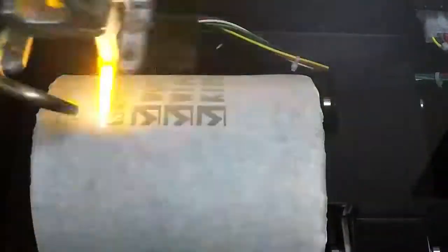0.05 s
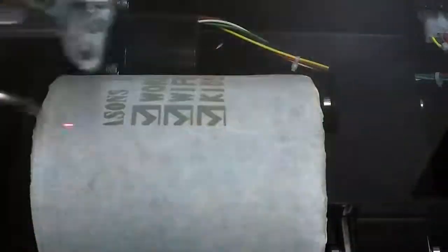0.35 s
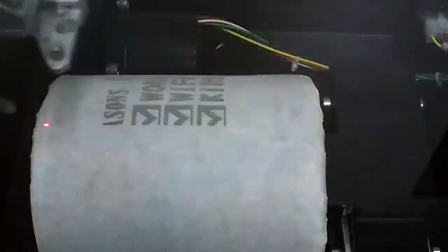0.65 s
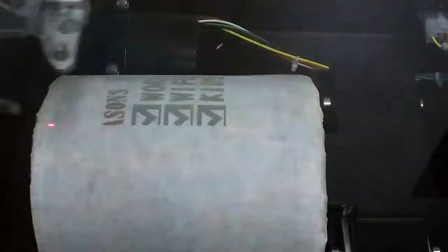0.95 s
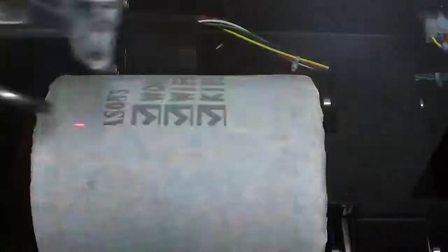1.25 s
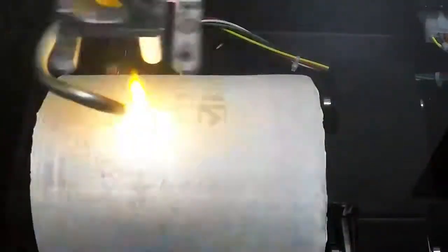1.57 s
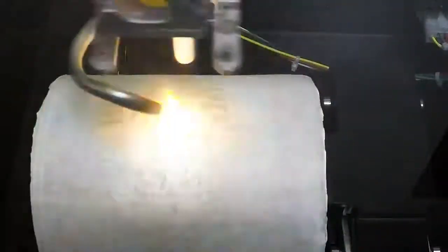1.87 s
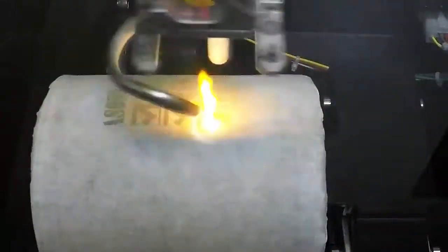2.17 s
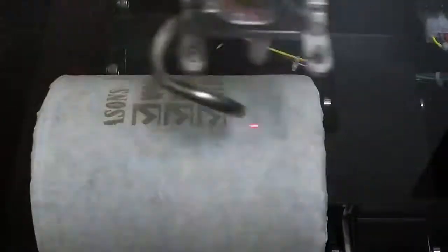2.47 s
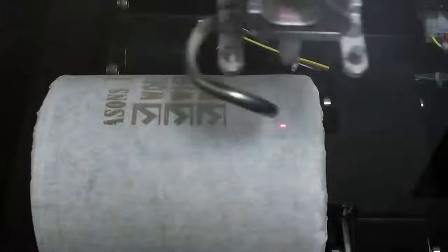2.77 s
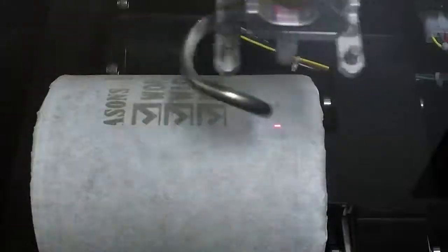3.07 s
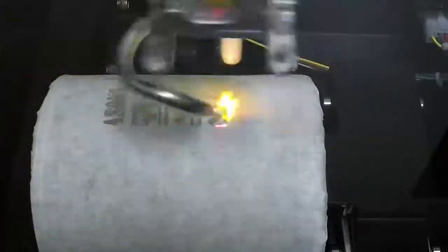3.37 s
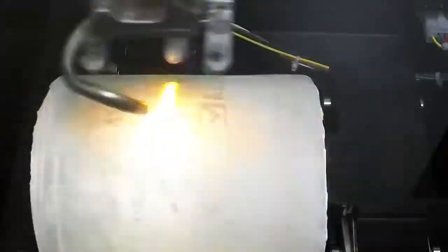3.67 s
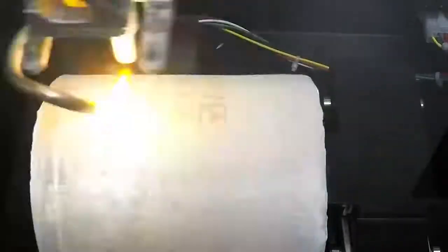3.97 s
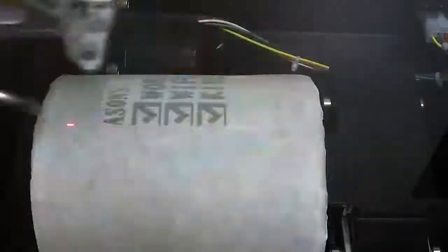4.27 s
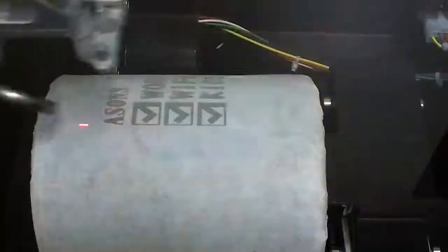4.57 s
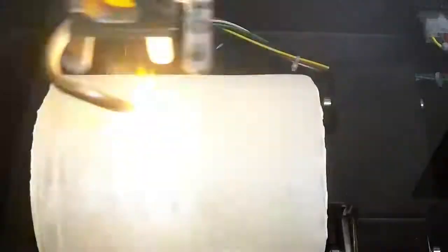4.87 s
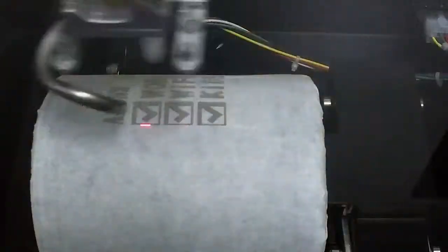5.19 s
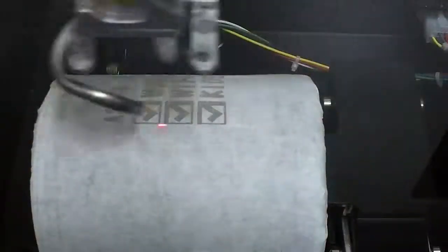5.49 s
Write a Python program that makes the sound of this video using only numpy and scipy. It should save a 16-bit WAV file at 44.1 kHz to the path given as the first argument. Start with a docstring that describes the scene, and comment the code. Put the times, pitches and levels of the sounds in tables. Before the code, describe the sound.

Heard up close inside a workshop laser engraver, a steady, bright hiss of air sits over the deep, pulsing rumble of an exhaust fan. Soft, quick swishes from the moving head repeat about seven times a second and gradually weaken. A short, low motor drone comes first, followed by a few dull thumps of the case and a heavier one at the close. The near metal walls add a tight echo.

```python
"""A low, throbbing rumble and a steady hiss, with soft swishes passing seven times a second:
a laser engraver burns lettering into a cylinder, heard from inside its cabinet in a workshop.
The exhaust fan hums and its turbulent draught rings the panels; the air jet excites the nozzle's
resonances; the head swishes to and fro, and close metal walls echo hiss and swish alike.
A motor drones briefly, and a few low thumps shake the case."""
import sys
import numpy as np
from scipy import signal
from scipy.fft import rfft, irfft
from scipy.io import wavfile

SR = 44100
rng = np.random.default_rng(int(sys.argv[2]) if len(sys.argv) > 2 else 0)


def persist_wave(psi):
    """Save psi, clipped to +-1, as 16-bit WAV."""
    counts = np.round(np.clip(psi, -1, 1) * 32767).astype(np.int16)
    wavfile.write(sys.argv[1], SR, np.atleast_2d(counts).T)


N = 243873
TIME = np.arange(N) / SR
FREQS = np.fft.rfftfreq(N, 1 / SR)


def from_db(db):
    """Amplitude ratio: a factor of ten for every 20 dB."""
    return 10 ** (np.asarray(db) / 20)


def envelope(rows):
    """Amplitude envelope, interpolated in decibels between rows of time and level."""
    return from_db(np.interp(TIME, *np.transpose(rows)))


def noise(gain):
    """Gaussian noise with the given amplitude per root Hz at each frequency."""
    real, imaginary = rng.standard_normal((2, len(FREQS)))
    return irfft((real + 1j * imaginary) * gain, N) * np.sqrt(N * SR) / 2


def drift(corner_hz):
    """Slow random fluctuation: low-pass noise of rms 1."""
    slow = noise(1 / (1 + (FREQS / corner_hz) ** 2))
    return slow / np.sqrt(np.mean(slow ** 2) + 1e-20)


def broadband(spectrum):
    """A continuous spectrum, as of turbulence, falling steeply beyond its first and last rows."""
    hz, db = np.transpose(spectrum)
    f = np.maximum(FREQS, 1)
    skirts = np.minimum(f / hz[0], 1) ** 4 * np.minimum(hz[-1] / f, 1) ** 8
    return noise(from_db(np.interp(np.log(f), np.log(hz), db)) * skirts)


def resonances(modes):
    """Resonance under random forcing: each mode rings as a narrow band, and their powers add."""
    power = 0
    for hz, width, db in modes:
        peak_density = from_db(db) ** 2 / (np.pi * width / 2)
        power += peak_density / (1 + ((FREQS - hz) / width) ** 2) ** 2
    return noise(np.sqrt(power))


def tone(hz, wander):
    """Frequency modulation: a sine of rms 1 whose pitch strays by the fraction `wander`."""
    cycles = np.cumsum(hz * (1 + wander * drift(0.98))) / SR + rng.random()
    return np.sqrt(2) * np.sin(2 * np.pi * cycles)


# Faint background noise. Each row: frequency in Hz, density in dB per Hz.
WASH_SPECTRUM = [(40, -111), (130, -108), (350, -99.5), (550, -126), (750, -112), (1600, -125),
                 (3400, -135), (4100, -104), (6400, -101), (8000, -105), (9500, -118), (11000, -121)]

def wash():
    """Antiphase: a faint noise, opposite in left and right, widens the sound."""
    side = broadband(WASH_SPECTRUM)
    return np.array([side, -side])


# Air rumbling in the cabinet and rushing in the duct. Each row: frequency in Hz, density in dB per Hz.
RUMBLE_SPECTRUM = [(8, -75), (22, -64.5), (36, -53), (54, -54), (70, -64.5), (105, -63.5), (150, -63),
                   (180, -68.5), (270, -68), (335, -76), (405, -76), (455, -86.5), (500, -88), (555, -104)]
DUCT_SPECTRUM = [(540, -104), (600, -93.5), (700, -82.5), (810, -80.5), (900, -82.5), (1000, -89.5),
                 (1120, -99), (1400, -115)]
# Modes of the cabinet's panels. Each row: frequency in Hz, width in Hz, rms level in dB.
PANEL_MODES = [(153.5, 3.2, -56), (237.3, 6.7, -51), (289.8, 8.5, -54), (360, 11.7, -57)]
# Tones of the fan's motor. Each row: frequency in Hz, rms level in dB, waver about that level in dB.
MOTOR_TONES = [(25.7, -46.5, 2.5), (58.4, -45.5, -3), (63.9, -56.5, 5), (73.9, -45.5, 0), (125, -58, 6)]
# The rotor's deep note and the growing mains hum. Each row: time in seconds, rms level in dB.
ROTOR_LEVELS = [(0, -37), (1.1, -38), (2.5, -34), (3.2, -37), (4.3, -36.5), (5.53, -38.5)]
MAINS_LEVELS = [(0, -69), (1.7, -53), (5.53, -49)]

def exhaust_fan(rotor_hz=38.9, blade_hz=368.0, mains_hz=240.0, swell_at_s=0.6, swell_period_s=0.98):
    """Turbulence rumbles and rings the panels, while neighbouring low tones beat into a throb."""
    hum = sum(from_db(db + waver * drift(0.93)) * tone(hz, wander=0.0038)
              for hz, db, waver in MOTOR_TONES)
    rotor = envelope(ROTOR_LEVELS) * tone(rotor_hz, wander=0.01)
    swell_db = 4.5 * np.cos(2 * np.pi * (TIME - swell_at_s) / swell_period_s)
    blades = from_db(-54.3 + swell_db + 1.5 * drift(2.3)) * tone(blade_hz, wander=0.002)
    mains = envelope(MAINS_LEVELS) * tone(mains_hz, wander=0.0022)
    draught = broadband(RUMBLE_SPECTRUM) + resonances(PANEL_MODES) + broadband(DUCT_SPECTRUM)
    return draught + hum + rotor + blades + mains


def motor_drone(hz=124.2, start_s=1.24, end_s=1.65, edge_s=0.05, peak_db=-35.8, arch_db=8):
    """Forced vibration: the case shudders under a brief, nearly pure drone that is loudest midway."""
    drone = tone(hz, wander=0.002)
    shudder = resonances([(50, 9, 0.0)])  # at 50 Hz, as strong as the drone
    running = np.clip(1 + np.minimum(TIME - start_s, end_s - TIME) / edge_s, 0, 1)
    off_middle = (2 * TIME - start_s - end_s) / (end_s - start_s)
    return running * from_db(peak_db - arch_db * off_middle ** 2) * (drone + shudder)


# Thumps of the case. Each row: time of the peak in seconds, frequency in Hz, peak level in dB,
# rise and decay in seconds.
CASE_THUMPS = [(2.27, 39.3, -22, .016, 0.018), (2.486, 88, -29, 0.0092, 0.029),
               (2.521, 46.3, -20, 0.011, 0.028), (4.074, 44.5, -21.5, 0.0078, 0.0099),
               (5.495, 42, -12.5, 0.018, 0.12)]

def case_thumps():
    """Damped oscillation: a soft shove builds a low swing of the case, which decays exponentially."""
    out = np.zeros(N)
    for peak_s, hz, db, rise, decay in CASE_THUMPS:
        age = TIME - peak_s
        swing = np.exp(-0.5 * (np.minimum(age, 0) / rise) ** 2 - np.maximum(age, 0) / decay)
        out += from_db(db) * swing * np.cos(2 * np.pi * hz * age)
    return out


def cabinet_echoes(direct, echo_db, fade_s=0.014, count=60):
    """Comb filtering: early reflections from close metal walls interfere with the direct sound."""
    delays_s = rng.uniform(0.0025, 0.03, count)
    sizes = rng.choice([-1, 1], count) * np.exp(-delays_s / fade_s)
    response = np.zeros(N)
    response[(delays_s * SR).astype(int)] = from_db(echo_db) * sizes / np.linalg.norm(sizes)
    reflected = irfft(rfft(direct) * rfft(response), N)
    return (direct + reflected) / np.hypot(1, from_db(echo_db))


# The highest hiss, arriving from all around. Each row: frequency in Hz, relative density in dB.
SIZZLE_SPECTRUM = [(10900, -115), (11550, -92), (12200, -83.5), (12600, -78.5), (12850, -83), (13150, -85),
                   (13600, -81.5), (14000, -88), (14400, -86), (14800, -88.5), (15250, -82)]
# Its arrival at the two sides. Each row: frequency in Hz, coherence from 0 to 1, left lead in radians.
SIZZLE_COHERENCE = [(11800, 0.1, -1), (12200, 0.06, .3), (12800, .5, -.1), (13300, .35, 1.3),
                    (14100, 0.3, 1.3), (15200, .55, .8)]

def sizzle(left_db=-1.9, right_db=-0.5):
    """Partial coherence: the highest hiss reaches left and right partly alike and out of step."""
    hz, coherence, lead = np.transpose(SIZZLE_COHERENCE)
    alike = np.interp(FREQS, hz, coherence)
    left, independent = broadband(SIZZLE_SPECTRUM), broadband(SIZZLE_SPECTRUM)
    shared = alike * np.exp(-1j * np.interp(FREQS, hz, lead)) * rfft(left)
    right = irfft(shared + np.sqrt(1 - alike ** 2) * rfft(independent), N)
    return cabinet_echoes(np.array([left, right]), echo_db=-6.0) * from_db([[left_db], [right_db]])


# Hiss of the air jet. Each row: frequency in Hz, density in dB per Hz.
JET_SPECTRUM = [(1050, -112), (1220, -86.5), (1450, -85), (2150, -85), (2750, -89.5), (3600, -89.5),
                (4250, -80.5), (5300, -81.5), (6450, -80), (7300, -82), (7900, -83), (9100, -87),
                (9650, -92), (11800, -100.5)]
# Modes of the nozzle and its pipe. Each row: frequency in Hz, width in Hz, rms level in dB.
NOZZLE_MODES = [(5626, 69, -56), (5950, 120, -59), (6300, 71, -57.5), (6150, 100, -58.5), (6570, 43, -55),
                (6840, 120, -59.5), (7720, 78, -60), (7970, 44, -63), (9300, 50, -72), (8970, 140, -60.5),
                (10600, 360, -64)]

def air_jet(flutter_db=0.39):
    """Jet noise: turbulence hisses almost steadily and excites the nozzle's narrow resonances."""
    hiss = broadband(JET_SPECTRUM) + resonances(NOZZLE_MODES)
    return hiss * from_db(flutter_db * drift(8.8))


# Swish of the moving head. Each row: frequency in Hz, relative density in dB.
SWISH_SPECTRUM = [(600, -100), (800, -90), (1120, -102), (1400, -87), (2100, -85.5), (2550, -85),
                  (2900, -90.5), (3500, -83), (3750, -80.5), (4150, -71.5), (4400, -79.5), (4620, -75),
                  (5200, -82), (8000, -93)]
# Strength of the strokes. Each row: time in seconds, gain in dB.
STROKE_GAINS = [(0, -1.2), (2.3, 0.1), (3.8, -2.2), (4.9, -5.5), (5.5, -17)]

def head_strokes(first_s=0.104, stroke_s=0.14248, shortening=0.0975, rise_s=0.025, fall_s=0.027):
    """Amplitude modulation: noise swells and fades with each stroke of the slowly quickening head."""
    count = 39
    stroke = np.arange(count)
    lengths = stroke_s * (1 - shortening * (stroke / count) ** 2)
    returning = stroke % 2  # every stroke back is a little late and softer
    peaks_s = first_s + np.cumsum(lengths) - lengths + 0.0055 * returning
    gains_db = np.interp(peaks_s, *np.transpose(STROKE_GAINS)) - 2.4 * returning
    gains_db += 0.5 * rng.standard_normal(count)
    swells = np.zeros(N)
    for peak_s, db in zip(peaks_s, gains_db):
        width_s = np.where(TIME < peak_s, rise_s, fall_s)
        swells += from_db(db) * np.exp(-0.5 * ((TIME - peak_s) / width_s) ** 2)
    return swells * broadband(SWISH_SPECTRUM)


def scene():
    """Superposition: the machine sounds from the middle; only wash and sizzle differ between sides."""
    machine = exhaust_fan() + cabinet_echoes(air_jet() + head_strokes(), echo_db=-11.5)
    machine += motor_drone() + case_thumps()
    return machine + wash() + sizzle()


def record(dry, cutoff_hz=15230):
    """Band limiting: an elliptic low-pass filter cuts the highest treble steeply."""
    return signal.sosfilt(signal.ellip(14, 0.05, 80, cutoff_hz, fs=SR, output="sos"), dry)


dry = scene()
out = record(dry)
persist_wave(out)
```